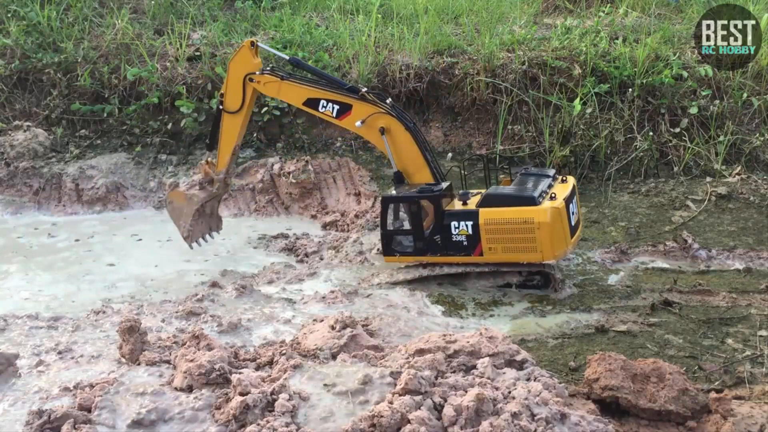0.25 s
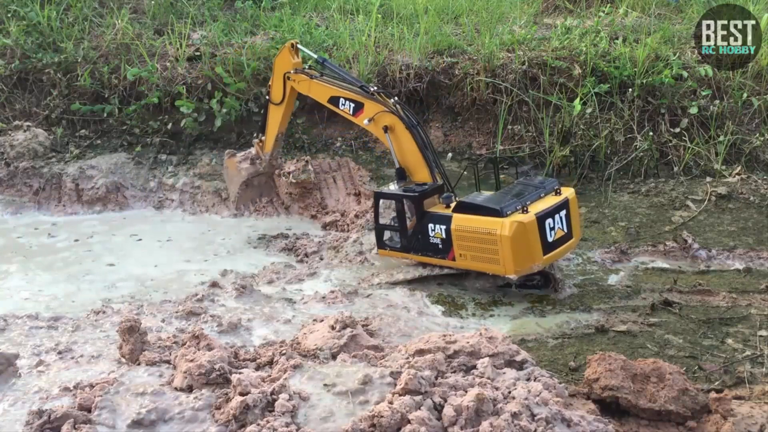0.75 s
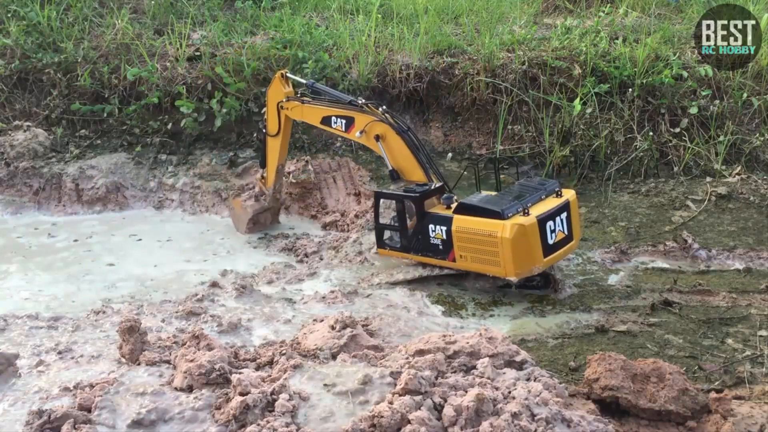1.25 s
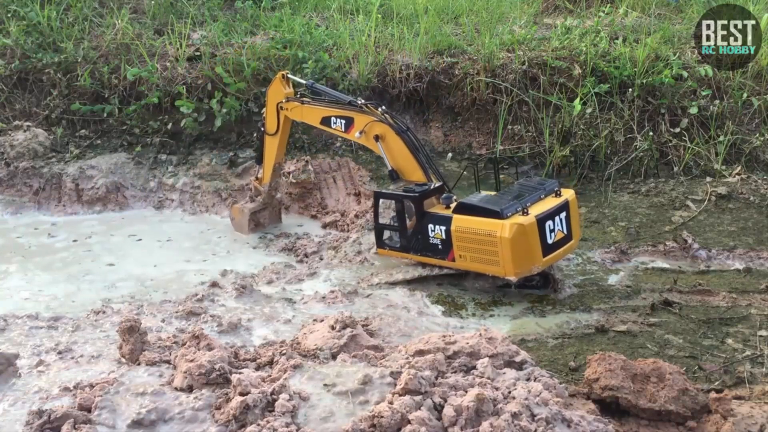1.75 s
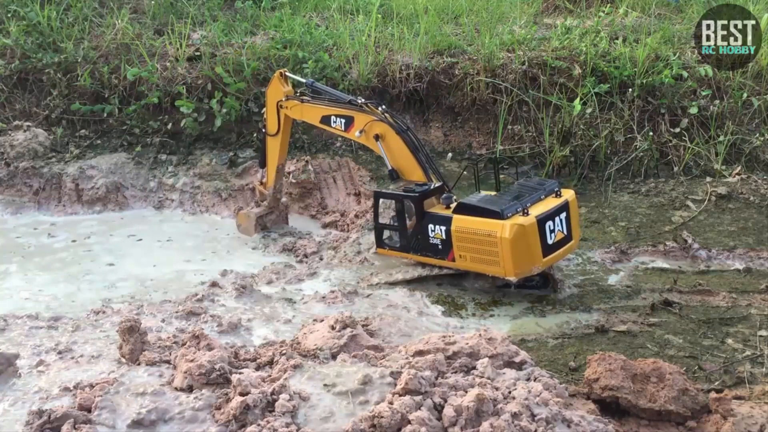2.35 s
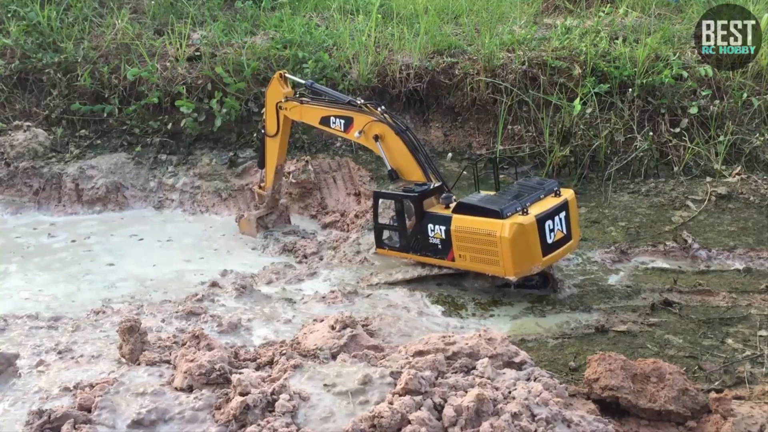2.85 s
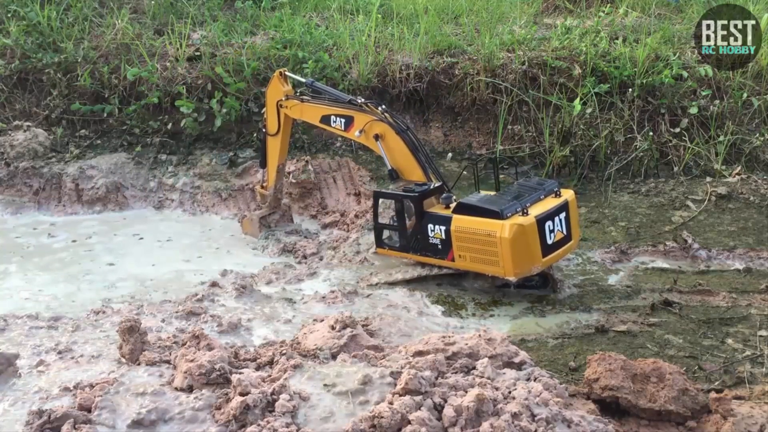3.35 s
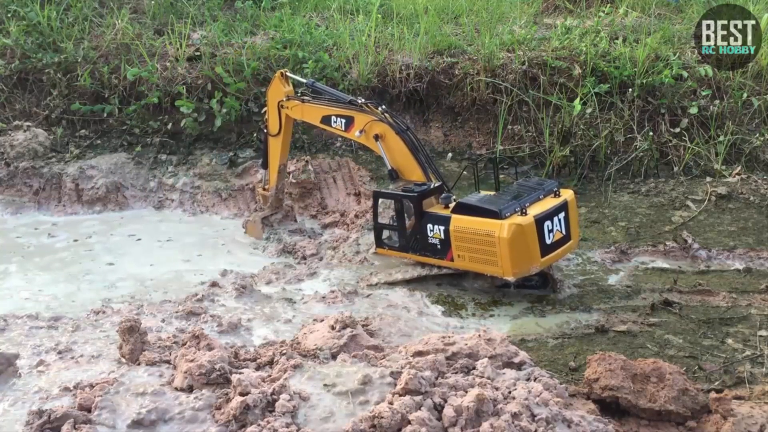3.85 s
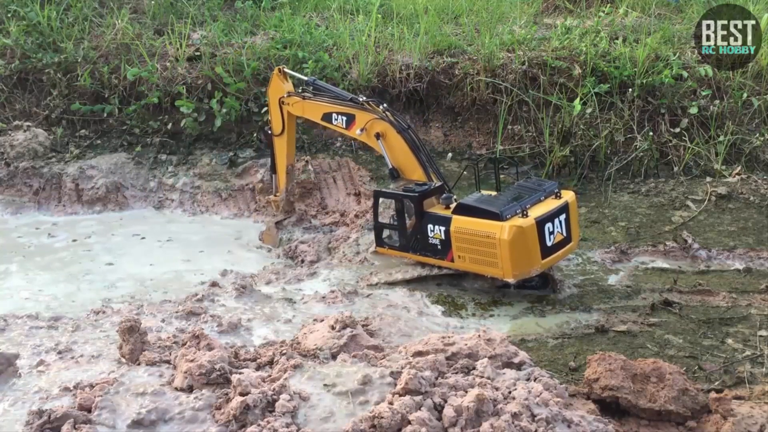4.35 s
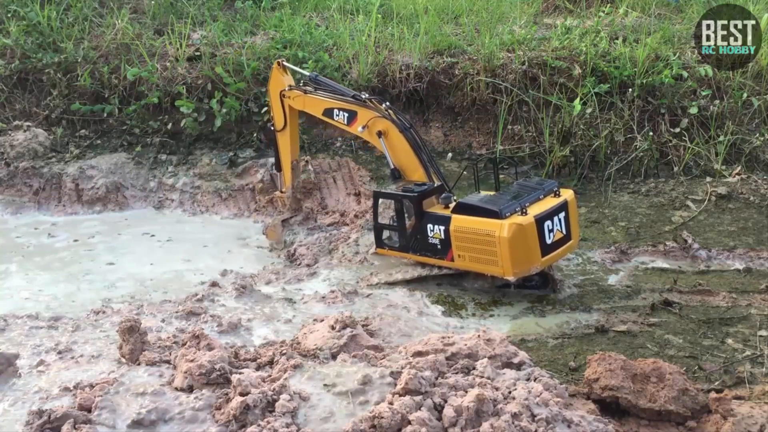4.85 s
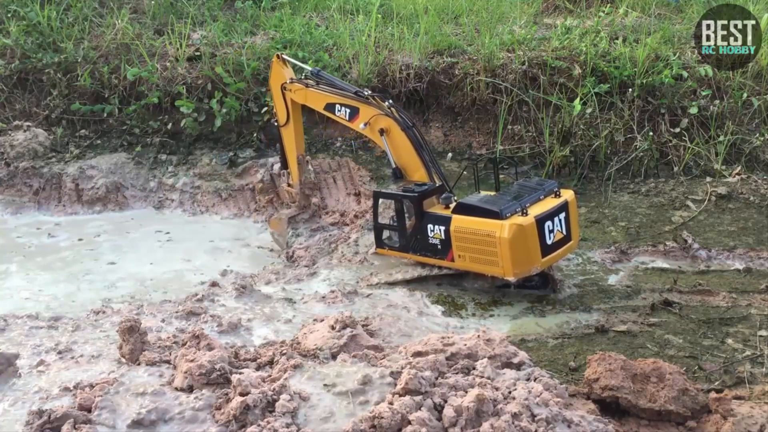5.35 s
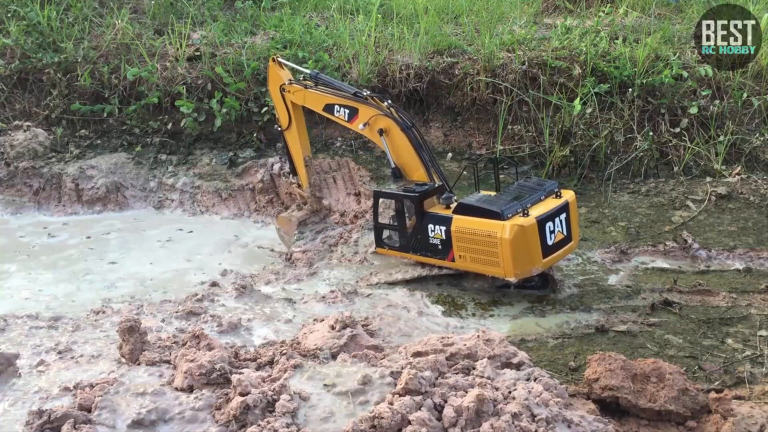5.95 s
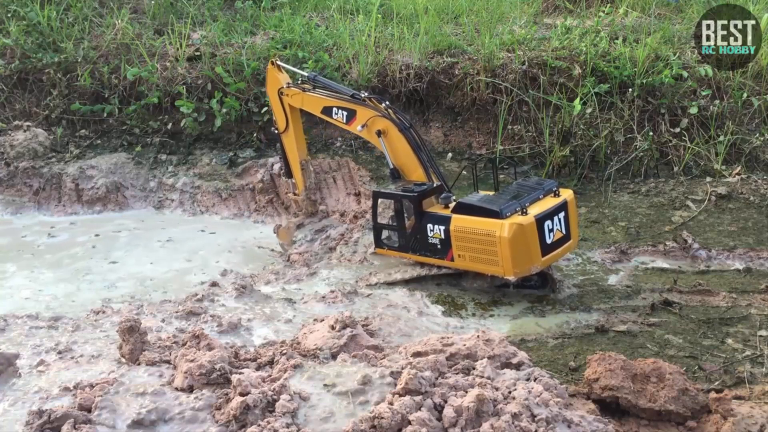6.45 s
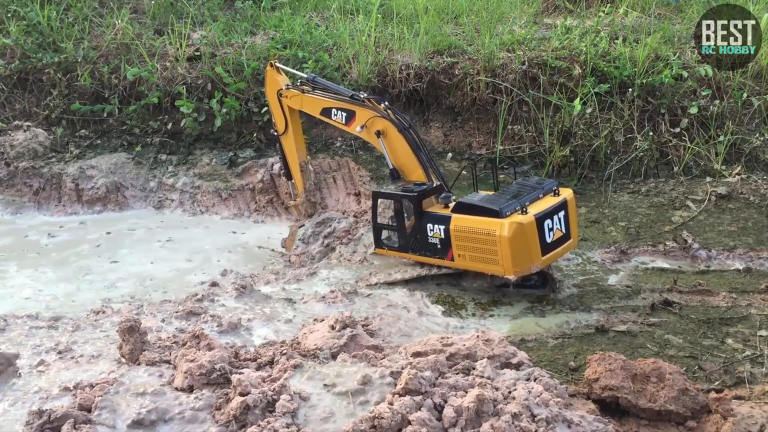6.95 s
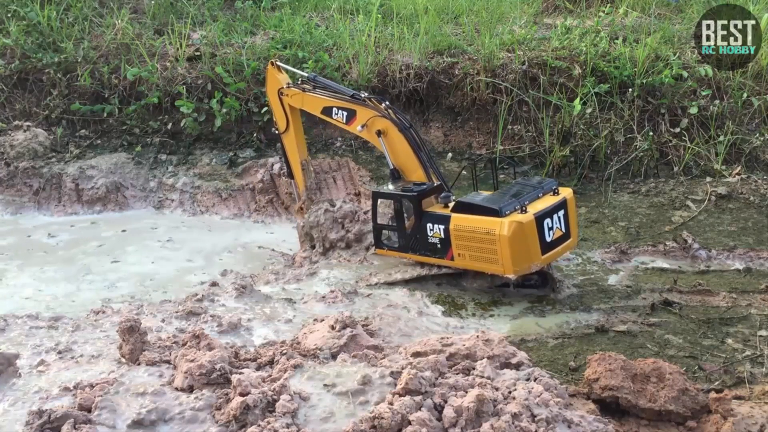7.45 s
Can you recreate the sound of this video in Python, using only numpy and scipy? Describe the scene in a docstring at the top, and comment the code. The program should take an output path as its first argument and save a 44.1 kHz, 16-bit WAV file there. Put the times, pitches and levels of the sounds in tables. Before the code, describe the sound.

Wavering motor hum and rushing gear noise of a toy-sized excavator, with brief clusters of metallic clacks, gritty scrapes and thin whines over insect hiss.

```python
"""Small excavator in wet clay

A small radio-controlled excavator digs beside a pond, a few metres from a camera. Pump: wavering sines at shaft
orders, in a rush of patchy coloured noise; a gear motor whines as a thin tone. Bucket: knocks and gritty slips,
made of noise and impulses, drive sets of resonances; its steel rings in short thin tones. Around it, insects
hiss as coloured noise and sing as a drifting tone; a breeze rumbles on the microphone ports."""
import sys
import numpy as np
from scipy import signal
from scipy.fft import rfft, irfft, next_fast_len
from scipy.io import wavfile
from scipy.ndimage import uniform_filter1d, map_coordinates

SR = 44100
rng = np.random.default_rng(int(sys.argv[2]) if len(sys.argv) > 2 else 0)


def log_audio(samples):
    """Write samples as a 16-bit WAV file to the path given in sys.argv[1]."""
    # one column per channel
    frames = np.atleast_2d(samples).T
    # limit to full scale, then quantise
    limited = np.clip(frames, -1, 1)
    pcm = np.round(limited * 32767).astype(np.int16)
    wavfile.write(sys.argv[1], SR, pcm)


N = 339566  # length [samples]

# Pump speed: (time [s], hum frequency [Hz])
PUMP_SPEED = [(0, 163.1), (0.75, 164), (1.55, 166.8), (1.76, 181.9), (2.05, 180.6), (2.3, 167.4),
              (3.3, 168), (3.6, 160.4), (4.0, 158), (4.12, 162.5), (4.5, 167), (4.8, 163.7), (5.1, 166.2),
              (6.55, 169.3), (6.95, 161.8), (7.25, 162.1), (7.46, 170.6), (7.7, 175.8)]
# The hum swells and drops out: (time [s], level [dB])
HUM_LEVEL = [(0, -37), (0.08, -42), (0.17, -23), (0.28, -24), (0.37, -38), (0.6, -27), (0.73, -45),
             (0.86, -29), (0.97, -42.5), (1.1, -38.5), (1.35, -30), (1.45, -38), (1.54, -40.5),
             (1.62, -32.5), (1.76, -30), (2.04, -31.5), (2.31, -49), (2.4, -26.5), (2.5, -30),
             (2.68, -31.5), (2.82, -47), (2.92, -27), (3.0, -60), (3.4, -43), (4.03, -45), (4.1, -33),
             (4.2, -25), (4.36, -48), (4.49, -25.5), (4.59, -45), (4.63, -28), (4.68, -50), (4.72, -26),
             (4.8, -38.5), (4.95, -32.5), (5.08, -31), (5.17, -29.5), (5.3, -60), (5.42, -27),
             (5.53, -31.5), (5.61, -27), (5.68, -41), (5.71, -27), (5.87, -34.5), (5.97, -27), (6.11, -40),
             (6.18, -30), (6.36, -40), (6.42, -32), (6.67, -39), (6.86, -30), (6.92, -35), (7.16, -28.5),
             (7.26, -40), (7.41, -42), (7.46, -21), (7.57, -49), (7.7, -43)]
# Other orders of the hum: (time [s], octave level [dB], order 1.5 level [dB], half order level [dB])
ORDER_LEVELS = [(0, -35.5, -49, -53), (0.75, -36.5, -41.5, -56), (1.0, -47, -40, -46),
                (1.3, -42, -39.5, -48), (1.6, -47.5, -39.5, -46.5), (2.25, -47.5, -62, -50.5),
                (3.15, -43, -65, -42.5), (3.9, -68, -42.5, -57), (4.5, -50, -74, -44.5),
                (5.5, -49.5, -47, -43.5), (6.3, -41, -40.5, -44), (7.7, -48, -38.5, -47.5)]
# Spectrum of the machine rush: (frequency [Hz], relative density [dB per Hz])
RUSH_SPECTRUM = [(20, -68), (40, -22.5), (70, -12.5), (125, -17), (165, -5), (210, -8), (330, -12.5),
                 (480, -15), (770, -14.5), (1350, -17), (1900, -27), (2700, -28), (4500, -28.5),
                 (7800, -50)]
# Machine rush in three ranges: (time [s], low level [dB], middle level [dB], top level [dB])
RUSH_LEVELS = [(0, -30.5, -33, -39), (0.5, -30, -32.5, -38.5), (1.3, -30, -36.5, -40.5),
               (1.78, -29, -37.5, -41), (2.25, -34, -39, -44.5), (2.7, -31, -38, -43), (2.9, -32, -34, -45),
               (3.28, -33.5, -44.5, -45.5), (3.55, -37, -40, -41.5), (4.05, -34, -44, -42.5),
               (4.6, -33, -37.5, -41), (4.95, -35, -39, -42.5), (5.4, -34, -42.5, -44),
               (6.3, -34.5, -41, -45), (6.6, -31, -37.5, -43), (7.35, -31.5, -35.5, -42.5),
               (7.7, -29, -38, -41)]
# Gear motor whine: (time [s], frequency [Hz], level [dB])
GEAR_WHINE = [(3.3, 729, -46), (3.95, 733, -62), (4.06, 735, -42.5), (4.24, 752, -37), (4.42, 765.3, -54),
              (4.72, 768, -42), (4.95, 723, -49), (5.12, 726.6, -43), (5.2, 720, -50), (5.5, 765, -40.5),
              (5.99, 762, -42.5), (6.07, 755, -63), (6.17, 757, -38), (6.46, 763, -35.5),
              (6.58, 760, -47.5), (6.7, 772.2, -39.5), (6.89, 760, -42.5), (6.96, 755, -51),
              (7.1, 752.6, -55)]
# Short thin tones: (peak time [s], frequency [Hz], level [dB], rise [s], fall [s]), 20 dB per rise or fall
SHORT_TONES = [(1.724, 6000, -37, .005, 0.045), (1.76, 5980, -39.5, .04, .03),
               (1.786, 5990, -31.5, 0.03, 0.043), (1.885, 6000, -36, 0.0055, 0.011),
               (2.745, 2840, -31.5, .02, .05), (2.803, 5070, -35.5, .004, .02),
               (3.142, 2620, -36, 0.012, 0.02), (3.298, 5910, -35.5, 0.0092, .015),
               (4.39, 6300, -42, .02, .03), (4.41, 2940, -34, .005, .015),
               (4.45, 2525, -31.5, 0.042, 0.019), (4.586, 3590, -40, 0.023, .015),
               (2.05, 5880, -46, 0.11, .04), (4.25, 1240, -37, 0.12, 0.063)]
# Bucket knocks: (time [s], level [dB], low shell [dB], walls [dB], brightness [dB], t60 of the main drive [s])
BUCKET_KNOCKS = [(1.698, -18.5, -9, 11, 8, 0.035), (1.7006, -20.5, 2, 0, 8.5, 0.056),
                 (1.704, -22.5, 5.5, -5, 2, 0.081), (1.776, -24, 1, 2, 1, 0.11),
                 (2.356, -32, -1, -5, 12, .05), (2.377, -24, -5, -1, 9.5, 0.16),
                 (2.394, -17.5, -8.5, 7, 2.5, 0.047), (2.676, -18, -15, 3, -3, 0.065),
                 (2.736, -22, -6, -9, 10, 0.1), (2.776, -22, 2, 5.5, -2, 0.11),
                 (2.788, -24, -4, 7.5, -1, 0.065), (2.801, -27, -4, 2, 7.5, 0.067),
                 (2.866, -28, -6, 9, 17, 0.18), (3.118, -18, -7, 0.5, 1, 0.11),
                 (3.129, -18, -7, 4, 6, 0.056), (3.137, -20, -6, 0, 2, 0.052),
                 (3.148, -19, -5, 7.5, 1, 0.066), (3.165, -22.5, -7, 7.5, -1, .06),
                 (3.213, -19, -5, 0.5, -4, 0.096), (3.245, -26, -10, -9, -9, 0.06),
                 (3.865, -33, -7, -1, 11.5, .05), (3.905, -45, 0, -7, 18.5, 0.036),
                 (4.006, -36, -5, -10, 15, 0.093), (4.407, -18.5, -3, 0, 4, 0.09),
                 (4.426, -14.5, 0, -2, -1, .05), (4.436, -20.5, -5, 3.5, 9, 0.048),
                 (4.449, -20, -3.5, 3, -1, 0.04), (4.458, -20, -6, 4, -0.5, 0.044),
                 (4.468, -20, -2, -1, -2, 0.05), (4.586, -14.5, -12, -7, -9, 0.038),
                 (4.862, -18, 5.5, 2, -5, .06), (4.876, -26, 8, 0, -6, .04), (4.932, -31, -1, 7, 0, 0.13),
                 (7.248, -28, 3, 2, -2, 0.063), (7.461, -28.5, 17, -12, -9, 0.043)]
# Bucket grinding: (peak time [s], level [dB], low shell [dB], walls [dB], brightness [dB], rise [s], fall [s])
BUCKET_GRINDING = [(1.71, -34, 9.5, 0.5, -10, 0.01, 0.24), (1.79, -34, 1, 0, 3.5, 0.075, 0.11),
                   (2.409, -26.5, -3, -3, 2.5, 0.094, 0.085), (2.689, -30, -2, -10, -7, 0.054, 0.078),
                   (2.744, -32, -1.5, 2, 9, 0.026, 0.1), (2.79, -37.5, -9, -1.5, -3, 0.046, 0.084),
                   (2.877, -31.5, -6, 2, -5, 0.0074, 0.19), (3, -32.5, 5, -14, -10, 0.079, 0.054),
                   (3.143, -27, -5.5, -2, -1, 0.067, 0.18), (3.25, -32, -4, -19, -16, 0.093, 0.1),
                   (4.452, -28, 0, -3.5, 1.5, 0.07, 0.12), (4.868, -33, 11, 5, -4, 0.004, 0.044),
                   (4.949, -34, 0.5, -6, -13, 0.05, 0.045), (7.47, -38, 7, 1, -4, 0.24, 0.28)]
# Main modes of the bucket: (frequency [Hz], width [Hz], relative gain [dB])
MAIN_MODES = [(650, 144, 3.5), (910, 234, -0.5)]
# Modes of the bucket's side walls: (frequency [Hz], width [Hz], relative gain [dB])
WALL_MODES = [(1107, 115, 0.5), (1367, 146, 2.5), (1750, 450, -7.5)]
# Low body modes of the shell: (frequency [Hz], width [Hz], relative gain [dB])
SHELL_MODES = [(193, 37, 2), (281, 58, 2), (410, 105, -3.5)]
# Upper steel modes of the teeth: (frequency [Hz], width [Hz], relative gain [dB])
TEETH_MODES = [(2060, 240, 4), (2710, 280, 1.5), (2890, 90, 6.5), (3580, 1100, -3.5)]
# Treble of the gritty contacts: (frequency [Hz], width [Hz], relative gain [dB])
GRIT_MODES = [(4820, 600, 3.5), (6040, 1000, 4.5), (7560, 860, 3)]
# Dips in the spectrum: (centre [Hz], half width [Hz], gain at full depth [dB])
SPECTRAL_DIPS = [(558, 42, -14), (1021, 85, -25), (1995, 90, -9), (3180, 88, -17), (4084, 128, -30),
                 (5340, 57, -11)]
# Faint diffuse side sound: (frequency [Hz], mean gain against the mid signal [dB])
SIDE_BLUR_SPECTRUM = [(300, -57.5), (700, -68.5), (1000, -49.5), (1500, -42.5), (2100, -25), (3200, -30),
                      (4500, -21), (8000, -35.5)]
# Share of the mid signal that leans right: (frequency [Hz], gain [dB])
RIGHT_LEAN = [(300, -67), (900, -61), (1500, -41.5), (3000, -28), (8000, -26)]
# Insect hiss: (time [s], level in the mid signal [dB])
INSECT_LEVEL = [(0.0, -39.5), (1.93, -43), (2.04, -44.5), (3.19, -44), (3.75, -40.5), (4.65, -41.5),
                (5.64, -45), (7.51, -43), (7.7, -42.5)]
# Insect spectrum, mid signal: (frequency [Hz], relative density [dB per Hz])
INSECT_MID_SPECTRUM = [(2470, -7), (4200, -8), (4850, 3.5), (5260, 2), (6310, 4), (7190, 0), (9210, -15.5),
                       (9950, -32), (10100, -37.5), (10600, -42), (13800, -64), (22000, -120)]
# Insect spectrum, side signal: (frequency [Hz], relative density [dB per Hz])
INSECT_SIDE_SPECTRUM = [(2530, -39), (4300, -5.5), (5020, 0.5), (6580, 6.5), (7400, 0), (9040, -13.5),
                        (9860, -13), (10600, -25.5), (13800, -56), (22000, -120)]
# One high insect song that drifts: (time [s], frequency [Hz], level in the mid signal [dB])
INSECT_SONG = [(0, 9620, -75), (1.6, 9800, -68.5), (2.1, 9670, -93), (3.2, 9500, -82), (4.25, 10110, -66.5),
               (5, 9570, -73), (5.5, 9820, -70), (6.6, 9500, -71.5), (7.7, 9400, -84)]
# Breeze strength: (time [s], level [dB])
BREEZE_LEVEL = [(0, -49), (1.8, -49), (2.05, -43.5), (2.7, -42), (3.5, -42), (4.3, -40), (4.6, -54),
                (5.1, -51), (5.4, -58), (7.1, -58), (7.7, -80)]
# Spectrum of the breeze: (frequency [Hz], relative density [dB per Hz])
BREEZE_SPECTRUM = [(12, -42), (20, -6.5), (70, 15.5), (125, 7), (173, 18), (300, -12), (443, -45),
                   (500, -44.5), (650, -80.5), (1100, -120)]

# Share of the middle and top rush that pulses once a shaft turn and once a hum cycle
SHAFT_BEAT, TOOTH_BEAT = .14, .13
BROAD, NARROW = (512, 6, 10), (2048, 3, 4)  # patch shapes: (window [samples], bins, frames)
CLANK_DB, TREBLE_DB = -9, -21  # drive of teeth and grit against the main modes, at brightness 0
TREBLE_GROWS = 1.98  # grit drive [dB per dB of brightness]
CONTACT_S = .0005  # time constant with which a knock's rattle builds
SNAP_DB, SNAP_S, SNAP_GROWS = -22, .005, 1.5  # bare first contact: level, t60, dB per dB of brightness
BLOW_DB = 13.5  # the single hard blow that opens a knock
# Grains of clay and stone that snap under the blade: rate, level against the slips, spread
CRACKLES_PER_S, CRACKLE_DB, CRACKLE_SPREAD_DB = 120, 0, 4
SIDE_BLUR_S = .04  # t60 of the side blur
# Wander of each dip: share of its frequency, share of its depth, random knots a second
DIP_DRIFT, DIP_DEEPENS, DIP_RATE = .012, .9, 24
CEILING, TOP_HZ = .33, 10740  # peak limit [amplitude], band limit [Hz]


def pump():
    """Periodic displacement gives shaft orders that waver with oil load; oil and gears add broadband rush."""
    (hz,), (hum_db,) = curves(PUMP_SPEED), curves(HUM_LEVEL)
    octave_db, third_db, half_db = curves(ORDER_LEVELS)
    low_db, middle_db, top_db = curves(RUSH_LEVELS)
    hum = tone(hz, hum_db, waver=0.01358, rate=25, flutter_db=2.0)
    hum += tone(hz * 2, octave_db, waver=.014, rate=16, flutter_db=4.5)
    hum += tone(hz * 3 / 2, third_db, waver=0.0133, rate=25, flutter_db=3.5)
    hum += tone(hz / 2, half_db, waver=.06, rate=22, flutter_db=4)
    load = amp(0.3 * wobble(7))  # quick load changes move all three ranges of the rush
    low = amp(low_db + 0.91 * wobble(14)) * rush(RUSH_SPECTRUM, patchy_db=2.5, hi_hz=633, patch=NARROW)
    middle = amp(middle_db) * rush(RUSH_SPECTRUM, patchy_db=3.5, lo_hz=600, hi_hz=1920, patch=NARROW)
    top = amp(top_db) * rush(RUSH_SPECTRUM, patchy_db=3, lo_hz=1860, hi_hz=4600, patch=NARROW)
    shaft = np.pi * np.cumsum(hz) / SR  # shaft angle: two hum cycles a turn
    beat = 1 + SHAFT_BEAT * np.cos(shaft) + TOOTH_BEAT * np.cos(2 * shaft)
    return hum + load * (low + beat * (middle + top))


def whines():
    """Narrowband excitation: gears and steel give thin, nearly sinusoidal tones that come and go."""
    whine = during(GEAR_WHINE) * tone(*curves(GEAR_WHINE), waver=.006, rate=36, flutter_db=3.2)
    for peak_s, hz, db, rise_s, fall_s in SHORT_TONES:
        level_db = db + swell(peak_s, rise_s, fall_s)
        whine = whine + tone(hz, level_db, waver=0.0039, rate=90, flutter_db=1.0)
    return whine


def bucket():
    """Modal excitation: knocks and slips drive the main modes, walls, low shell, teeth and grit."""
    t = np.arange(SR // 4) / SR
    drive, snaps = np.zeros((5, N + len(t))), np.zeros(N + len(t))
    bursts = rng.standard_normal((len(BUCKET_KNOCKS), 6, len(t)))
    decay_rates = np.array([[1], [1.1], [.7], [1.3], [1.8]])  # treble dies first
    # the first hard contact is bright
    crack = np.array([[.6], [1.2], [.4], [2.6], [1.1]]) * amp(-60 * t / 0.0038)
    build = 1 - np.exp(-t / CONTACT_S)
    for (s, db, thud_db, wall_db, bright_db, t60), burst in zip(BUCKET_KNOCKS, bursts):
        start = round(s * SR)
        colour_db = parts(thud_db, wall_db, bright_db)
        fall = amp(-decay_rates * 60 * t / max(t60, .01))
        drive[:, start:][:, :len(t)] += amp(db - 9.5 + colour_db) * (fall + crack) * build * burst[:5]
        drive[:, start] += amp(db - 9.0 + BLOW_DB + colour_db)[:, 0]
        snap_db = db + SNAP_GROWS * bright_db + SNAP_DB
        snaps[start:][:len(t)] += amp(snap_db - 60 * t / SNAP_S) * burst[5]
    grinding = 0
    for s, db, thud_db, wall_db, bright_db, rise_s, fall_s in BUCKET_GRINDING:
        grinding = grinding + amp(db + swell(s, rise_s, fall_s)) * amp(parts(thud_db, wall_db, bright_db))
    drive[:, :N] += crackle() * grinding
    hz = np.fft.rfftfreq(4096, 1 / SR)
    rung = 0
    for part_drive, table in zip(drive, (MAIN_MODES, WALL_MODES, SHELL_MODES, TEETH_MODES, GRIT_MODES)):
        body = modes(table)
        body_rms = np.sqrt(np.mean(abs(body(hz)) ** 2))
        rung = rung + filtered(part_drive[:N], body) / body_rms
    # little of the bucket's sound reaches the very top
    lowpass = signal.butter(N=6, Wn=7800, fs=SR, output="sos")
    return signal.sosfilt(lowpass, rung + snaps[:N])


def parts(thud_db, wall_db, bright_db):
    """Modal participation: drive in dB of the main modes, walls, low shell, teeth and grit."""
    clank_db = CLANK_DB + bright_db
    treble_db = TREBLE_DB + TREBLE_GROWS * bright_db
    return np.array([0, wall_db, thud_db, clank_db, treble_db])[:, None]


def crackle():
    """Stick-slip friction: noise of slipping clay with separate snaps, one row for each bucket part."""
    own_grip = np.array([wobble(80) for _ in range(5)])
    # clay grips and lets go unevenly
    slips = amp(1.5 * wobble(45) + 2 * wobble(140) + 1.5 * own_grip)
    struck = rng.random(N) < CRACKLES_PER_S / SR  # the same moments for all parts
    strength = amp(CRACKLE_SPREAD_DB * rng.standard_normal((5, N)))
    snaps = struck * strength * rng.choice([-1, 1], (5, N))
    return unit(unit(slips * rng.standard_normal((5, N))) + amp(CRACKLE_DB) * unit(snaps))


def dips(hz, depth, shift):
    """Band rejection: gain of the spectral dips; depth and shift hold one row for each dip."""
    gain = 1
    for (centre, half_width, db), d, k in zip(SPECTRAL_DIPS, depth, shift):
        gain = gain * (1 - (1 - amp(d * db)) / (1 + ((hz * k - centre) / half_width) ** 4))
    return gain


def dipped(x, depth):
    """Time-varying filtering: dips in the spectrum, each wandering randomly in frequency and depth."""
    hz, t, z = signal.stft(x, SR, nperseg=2048, noverlap=1536)
    at = np.minimum((t * SR).astype(int), N - 1)
    wander = np.array([wobble(DIP_RATE)[at] for _ in range(2 * len(SPECTRAL_DIPS))])
    depth_wander, pitch_wander = wander.reshape(2, len(SPECTRAL_DIPS), -1)
    depths = depth * np.clip(1 + DIP_DEEPENS * depth_wander, .5, 3)
    gain = dips(hz[:, None], depths, 1 + DIP_DRIFT * pitch_wander)
    return signal.istft(z * gain, SR, nperseg=2048, noverlap=1536)[1][:N]


def side_blur(x):
    """Decorrelation: faint diffuse side sound, a blurred copy of the mid signal, randomly varying in level."""
    t = np.arange(SR // 10) / SR
    tail = rng.standard_normal(len(t)) * amp(-60 * t / SIDE_BLUR_S)
    blurred = signal.fftconvolve(x, tail / np.linalg.norm(tail))[:N]
    return amp(4 * wobble(9)) * filtered(blurred, lambda hz: amp(along(SIDE_BLUR_SPECTRUM, hz)))


def surroundings():
    """Superposed sources: insect hiss, one high song and port turbulence, as mid and side signals."""
    hiss_db, = curves(INSECT_LEVEL)
    song_hz, song_db = curves(INSECT_SONG)
    song = tone(song_hz, song_db, waver=.016, rate=260, flutter_db=3)  # a wide, buzzy band
    mid_gain = amp(hiss_db + 0.24 * wobble(9.1))
    mid = mid_gain * rush(INSECT_MID_SPECTRUM, patchy_db=2.5, patch=NARROW) + song
    side_gain = amp(hiss_db - 6.0 + .7 * wobble(8))
    side = side_gain * rush(INSECT_SIDE_SPECTRUM, patchy_db=2.5) + .6 * song
    puffs_db = 3.5 * wobble(8)  # the breeze comes in short puffs
    breeze = amp(curves(BREEZE_LEVEL)[0] + puffs_db) * rush(BREEZE_SPECTRUM, patchy_db=4.5)
    return mid, side + breeze


def rush(spectrum, patchy_db, lo_hz=0, hi_hz=22000, patch=BROAD):
    """Filtered random noise of rms 1, with patches of random gain, softly limited to a band."""
    window, bins, frames = patch
    z = signal.stft(rng.standard_normal(N), nperseg=window)[2]
    field = uniform_filter1d(uniform_filter1d(rng.standard_normal(z.shape), bins, 0), frames, 1)
    x = signal.istft(z * amp(patchy_db * unit(field)), nperseg=window)[1][:N]

    def response(f):
        """Spectral colour times gentle band edges."""
        edges = 1 / np.sqrt((1 + (lo_hz / (f + 1)) ** 8) * (1 + (f / hi_hz) ** 8))
        return amp(along(spectrum, f)) * edges

    return unit(filtered(x, response))


def tone(hz, db, waver, rate, flutter_db):
    """Random modulation: a sine about the given rms level whose pitch and strength waver."""
    turns = np.cumsum(hz * (1 + waver * wobble(rate))) / SR
    return np.sqrt(2) * amp(db + flutter_db * wobble(rate)) * np.sin(2 * np.pi * turns)


def modes(table):
    """Modal superposition: causal response of a set of resonances with alternating sign."""
    def response(f):
        """Sum of second-order resonances."""
        total = 0
        for k, (centre, width, db) in enumerate(table):
            resonance = 1j * f * width / (centre * centre - f * f + 1j * f * width + 1e-9)
            total = total + (-1) ** k * amp(db) * resonance
        return total

    return response


def filtered(x, response):
    """Linear filtering: the spectrum of x times a complex response of frequency."""
    m = next_fast_len(N + SR // 2)
    return irfft(rfft(x, m) * response(np.fft.rfftfreq(m, 1 / SR)), m)[..., :N]


def swell(peak_s, rise_s, fall_s):
    """Exponential envelope in dB: 0 at the peak, 20 down a rise before and a fall after."""
    t = np.arange(N) / SR - peak_s
    return -20 * np.where(t < 0, -t / max(rise_s, .002), t / max(fall_s, .002))


def wobble(rate):
    """Slow random modulation: a smooth curve with rate knots a second."""
    coarse = np.arange(0, N + 16, 16)
    knots = rng.standard_normal(int(N * rate / SR) + 4)
    return np.interp(np.arange(N), coarse, map_coordinates(knots, [coarse * rate / SR]))


def during(rows):
    """Gating: 1 inside the span of the rows, with a 2 ms rise and a 10 ms fall."""
    t = np.arange(N) / SR
    return np.clip(np.minimum((t - rows[0][0]) * 500, (rows[-1][0] - t) * 100), 0, 1)


def curves(rows):
    """Linear interpolation in time: one value per sample for each column after the time."""
    s, *cols = np.transpose(rows)
    return [np.interp(np.arange(N) / SR, s, c) for c in cols]


def along(points, hz):
    """Interpolation of (frequency [Hz], value) points on a log frequency axis."""
    f, v = np.transpose(points)
    return np.interp(np.log(hz + 1), np.log(f + 1), v)


def amp(db):
    """Level law: decibels to amplitude gain."""
    return 10 ** (np.asarray(db) / 20)


def unit(x):
    """Normalisation to rms 1."""
    return x / np.sqrt(np.mean(x ** 2) + 1e-20)


def scene():
    """Mid and side superposition: the machine stands a little to the right, the surroundings are wide."""
    mid, side = surroundings()
    still = np.ones(len(SPECTRAL_DIPS))
    bucket_sound = filtered(bucket(), lambda hz: dips(hz, 0.34 * still, still))
    mid = dipped(pump() + mid, depth=0.7) + bucket_sound + whines()
    side = side + side_blur(mid) - filtered(mid, lambda hz: amp(along(RIGHT_LEAN, hz)))
    return np.array([mid + side, mid - side])  # left, right


def record(dry):
    """Saturation and band limiting: the camera rounds off the highest peaks and cuts the top."""
    soft = dry / (1 + abs(dry / CEILING) ** 4) ** (1 / 4)
    return filtered(soft, lambda hz: hz < TOP_HZ)


dry = scene()
out = record(dry)
log_audio(out)
```